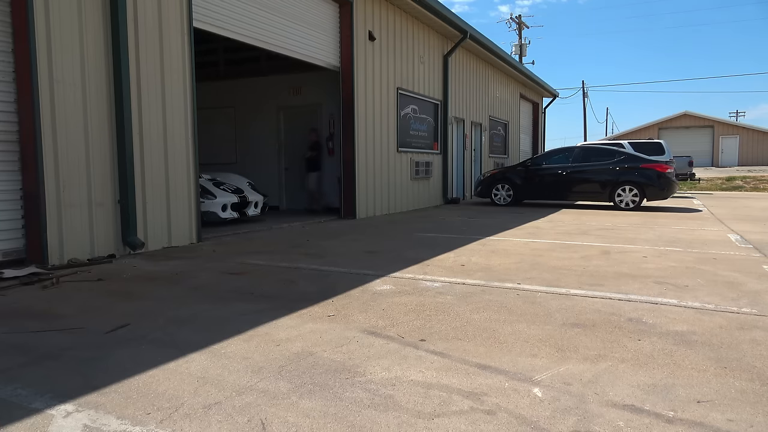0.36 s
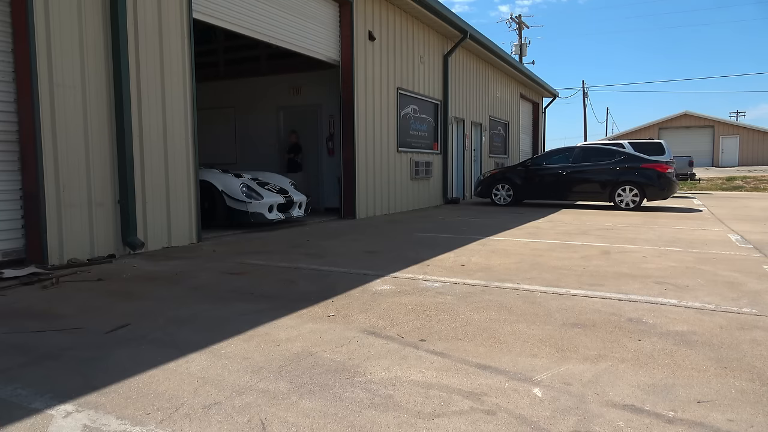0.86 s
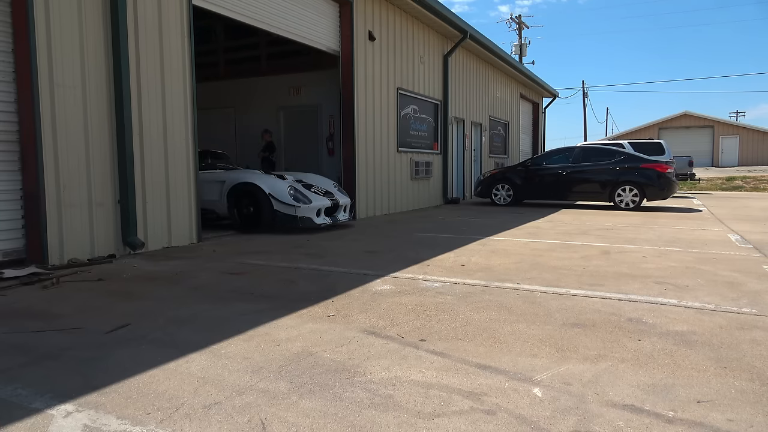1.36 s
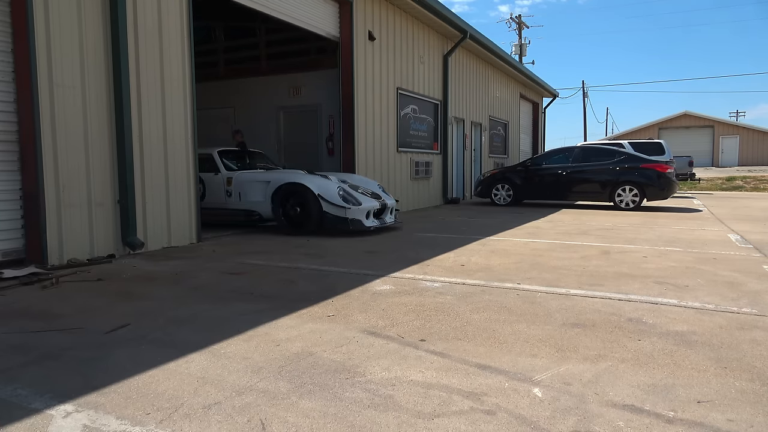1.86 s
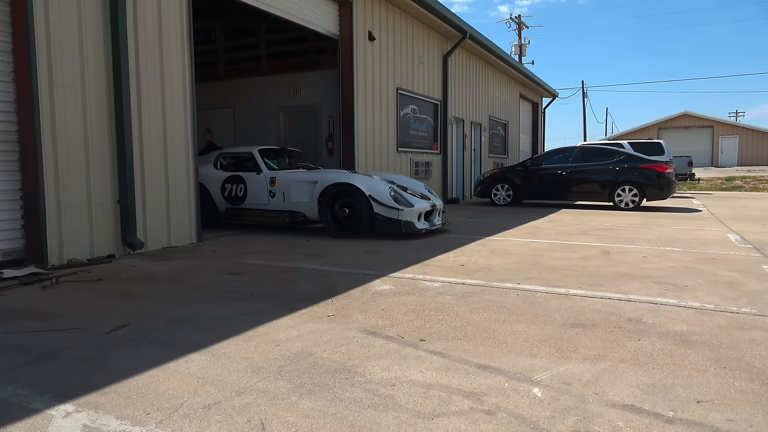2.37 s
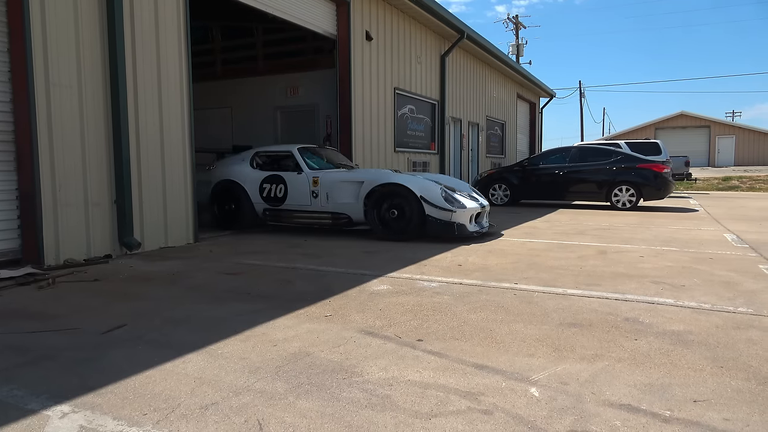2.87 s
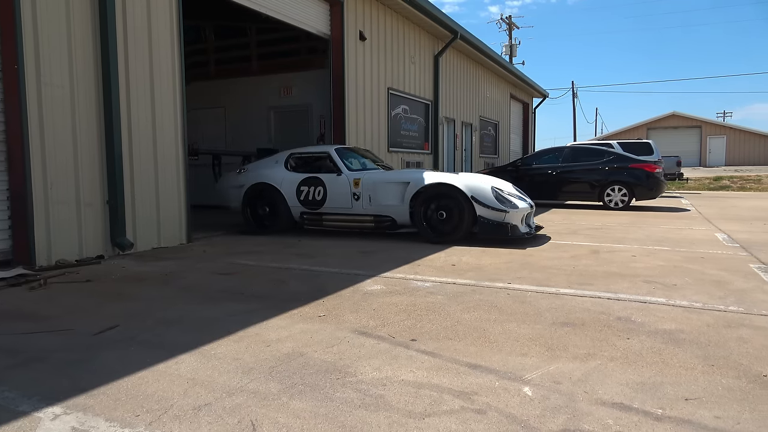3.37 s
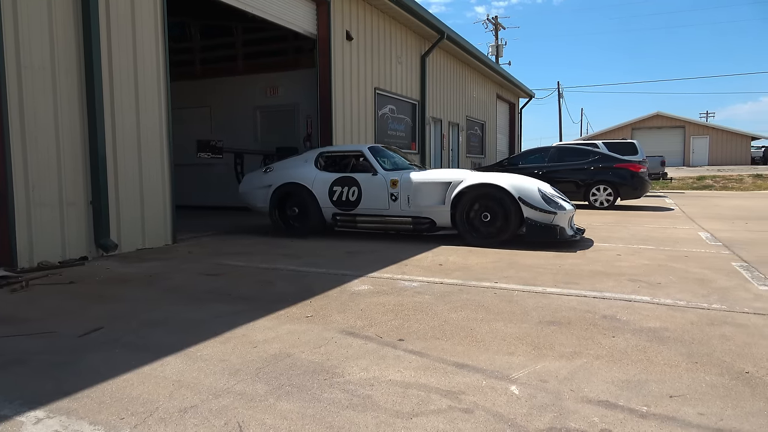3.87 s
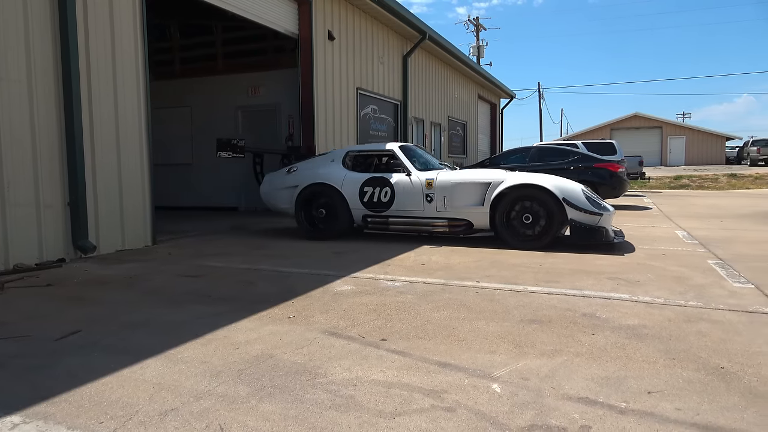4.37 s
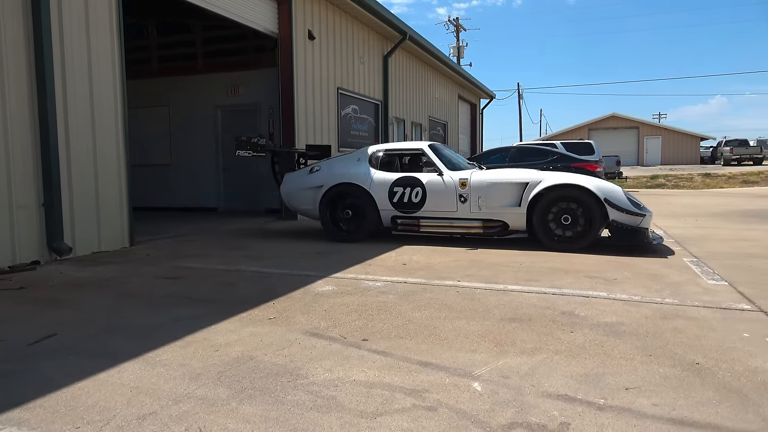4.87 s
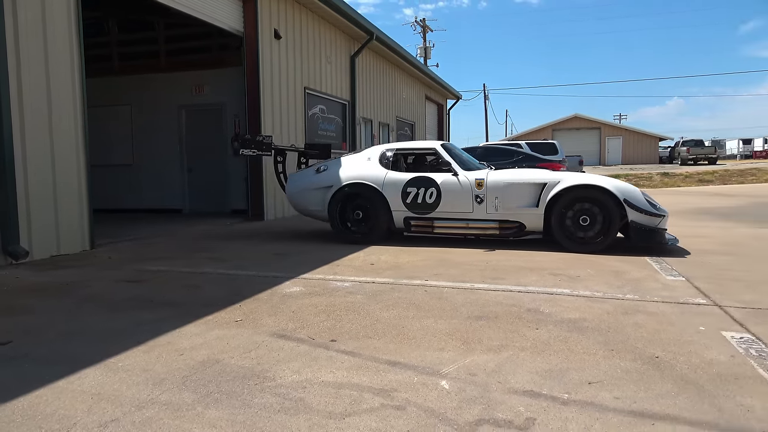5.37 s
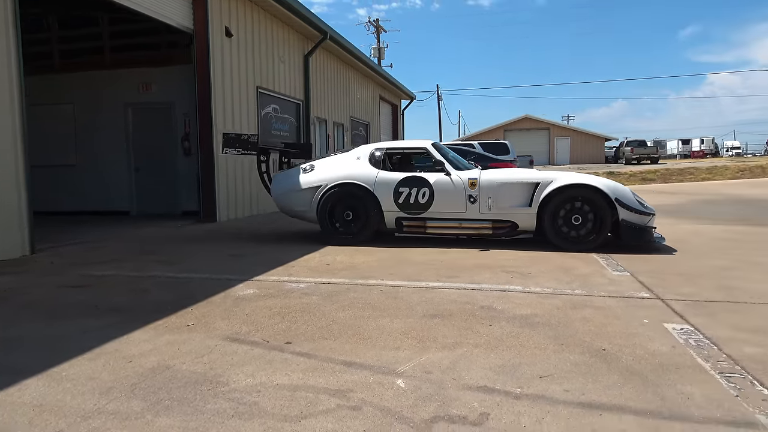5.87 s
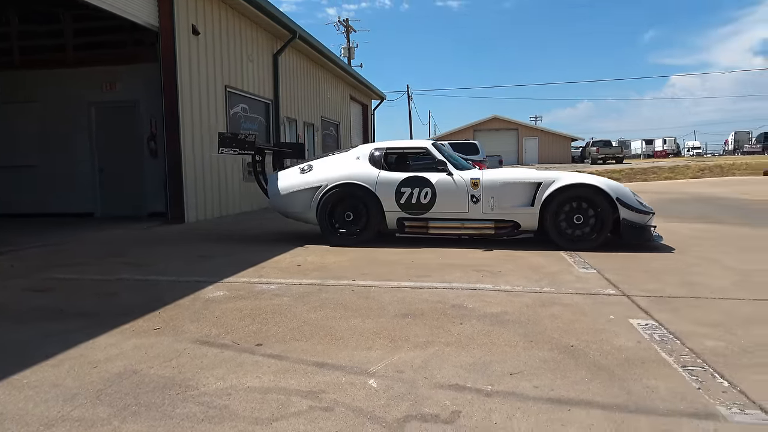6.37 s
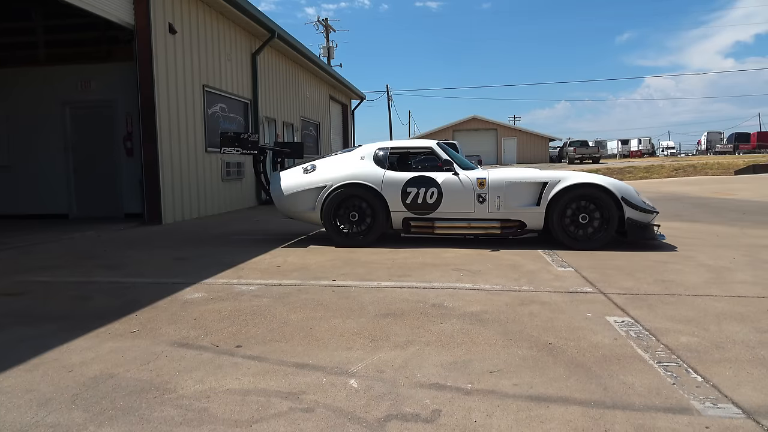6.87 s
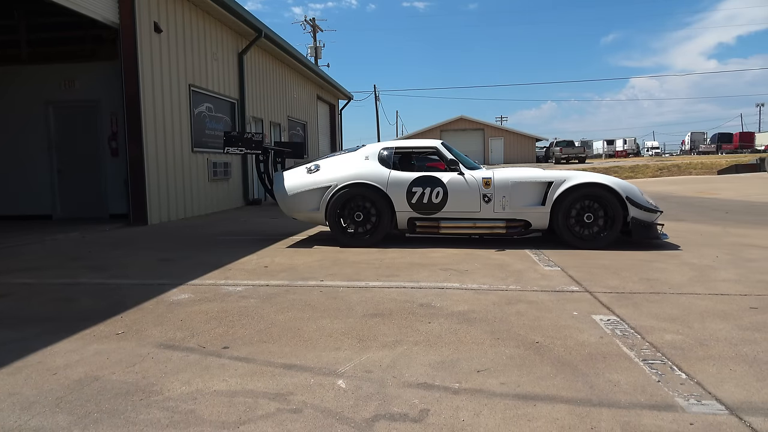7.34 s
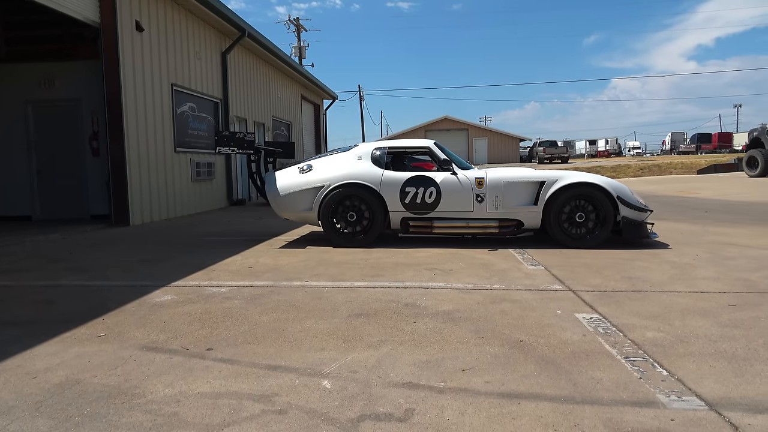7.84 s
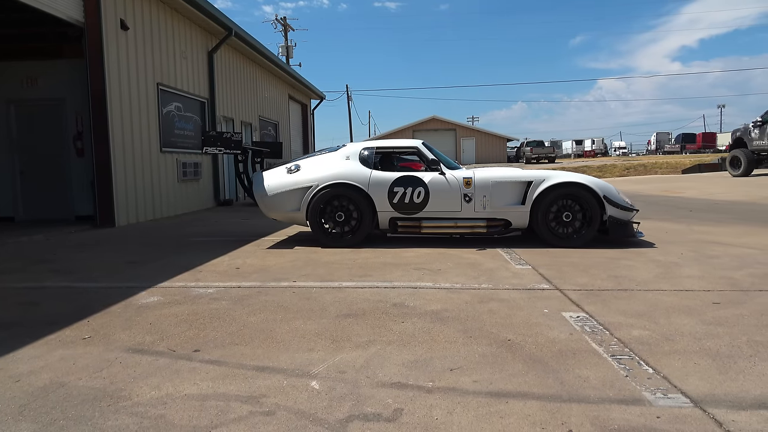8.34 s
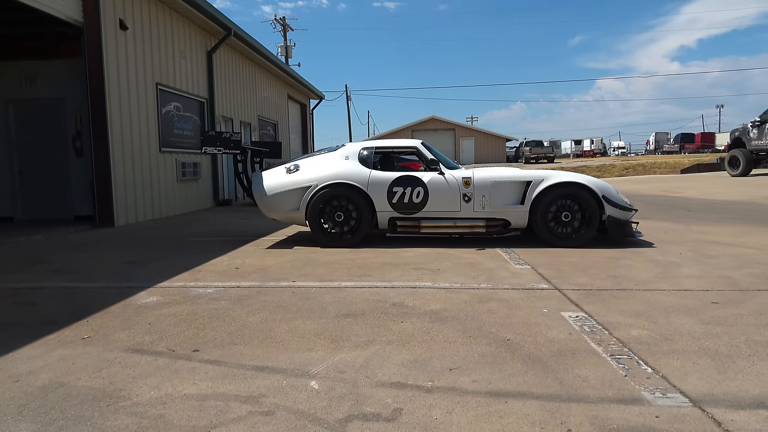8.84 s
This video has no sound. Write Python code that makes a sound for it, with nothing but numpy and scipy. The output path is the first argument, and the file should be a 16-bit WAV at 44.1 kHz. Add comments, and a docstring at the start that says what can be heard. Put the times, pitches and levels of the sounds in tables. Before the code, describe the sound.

Outdoors by a metal shed, a race car with a big V8 and side pipes creeps out onto concrete. Its fast, droning idle drops within the first second or so to a slow, lumpy burble of strong and weak beats. Raspy exhaust gusts, valve ticks and light hiss sit above, with a few tiny squeaks and scuffs. Stereo microphone at a modest distance, sound leaning left; the throttle opens at the very end.

```python
"""Uneven, lumpy exhaust beats of a cross-plane V8 with side pipes, falling from a fast idle to a slow one. The
car creeps out of a metal shed onto a concrete apron: firing impulses, most of them strong from the near pipe's
bank and faint from the far one, excite resonances and gate noise. Clear crank orders swell and fade early on.
Sharp cracks from the firings tick above a steady hiss, with lone scuffs and squeaks from the car; the throttle
opens at the very end. The recorder's limiter holds the peaks down."""
import sys
import numpy as np
from scipy import signal
from scipy.fft import rfft, irfft, next_fast_len
from scipy.io import wavfile
from scipy.ndimage import uniform_filter1d, minimum_filter1d

SR = 44100
rng = np.random.default_rng(int(sys.argv[2]) if len(sys.argv) > 2 else 0)


def attenuation_scalar(level_db):
    """Turn a level in dB into a linear amplitude multiplier (20 dB per decade)."""
    decades = np.asarray(level_db, float) / 20
    return 10 ** decades


def materialize(psi):
    """Save the field psi as 16-bit PCM at rate SR to the path in sys.argv[1].

    A 1-D psi becomes a single channel; in a 2-D psi each row is a channel.
    """
    bounded = np.clip(np.atleast_2d(psi).T, -1, 1)
    quanta = np.round(bounded * 32767).astype(np.int16)
    wavfile.write(sys.argv[1], SR, quanta)


N = 406602
LEFT_RIGHT = np.array([[1], [-1]])   # opposite signs in the two channels

# Crank speed. Each row: time in seconds, four-stroke cycles per second.
SPEED = [(0, 13.505), (.3, 12.893), (.6, 10.43), (.9, 9.07), (1.2, 8.697), (1.5, 8.554), (2.4, 7.786),
         (3.2, 7.416), (4, 7.268), (6, 7.081), (6.6, 7.376), (7.5, 7.163), (8.1, 7.397), (8.8, 7.223),
         (9.115, 7.3), (9.19, 8.05), (9.22, 8.45)]
# Unevenness of burning. Each row: time in seconds, unevenness from 0 to 1.
ROUGH = [(0, .4), (.8, .3), (1.2, .32), (4.2, .3), (4.5, .55), (5.1, .45), (5.5, .58), (7.0, .55),
         (7.3, .4), (9.22, .4)]
# The shed's lowest air mode and the lean of the pipe sound. Each row: time in seconds, mode level in dB,
# lean in dB (positive to the left; each layer takes its own share of it).
SHED = [(0.1, -40, 1.5), (0.4, -49, 2), (3.1, -37.5, 2.5), (4.2, -43, 1), (6.3, -42.5, 1),
        (9.2, -41.5, 1.13)]
# Engine block and covers that colour the noise. Each row: centre in Hz, width in Hz, level in dB.
# Signs alternate down the rows, so every second row is a dip between two peaks.
COVERS = [(1170, 120, -2.5), (2020, 150, -3), (2300, 130, 2), (2800, 300, -7), (3450, 200, -1),
          (5250, 200, -11), (5570, 230, -9)]
# Noisy treble before the throttle's rise. Each row: time in seconds, rasp level in dB, hiss level in dB.
TREBLE = [(0.05, -47, -56.5), (0.4, -53.5, -58), (0.76, -50.5, -58.5), (0.95, -51, -54.5), (2.05, -48, -54),
          (2.2, -51.5, -56.5), (3.35, -50, -56), (3.6, -48, -53), (4.3, -49.5, -54.5), (5.5, -49.5, -54.5),
          (5.75, -50.5, -56), (7.4, -50.5, -55), (7.95, -49.5, -54), (8.15, -53, -57), (9.1, -51.5, -56.5)]


def amp_curves(rows):
    """Linear interpolation: the columns of a table against time, one value a sample."""
    s, *columns = np.transpose(rows)
    return [np.interp(np.arange(N) / SR, s, c) for c in columns]


def crank_cycles():
    """Phase is the integral of frequency: engine cycles turned since the beginning."""
    return np.cumsum(amp_curves(SPEED)[0]) / SR


def even(x, seconds):
    """Level normalisation: division by the rms over a window smoothed twice."""
    width = int(seconds * SR)
    power = uniform_filter1d(uniform_filter1d(x ** 2, width), width)
    return x / np.sqrt(power + 1e-20)


def resonate(x, modes):
    """Modal superposition: parallel damped resonators whose signs alternate."""
    out = 0
    for k, (hz, width, level_db) in enumerate(modes):
        r = np.exp(-np.pi * width / SR)   # pole radius sets the bandwidth
        b = [(1 - r * r) / 2, 0, (r * r - 1) / 2]
        a = [1, -2 * r * np.cos(2 * np.pi * hz / SR), r * r]
        out = out + (-1) ** k * attenuation_scalar(level_db) * signal.lfilter(b, a, x + 1e-18)
    return out


def cut(x, hz, kind, order):
    """Butterworth filtering: a maximally flat passband."""
    return signal.sosfilt(signal.butter(order, hz, kind, fs=SR, output="sos"), x)


def colour(x, spectrum):
    """Spectral shaping: gain interpolated along log frequency, held at the table's end values."""
    hz, level_db = np.transpose(spectrum)
    size = next_fast_len(N)
    f = np.maximum(np.arange(size // 2 + 1) * SR / size, 1)
    gain = attenuation_scalar(np.interp(np.log(f), np.log(hz), level_db))
    return irfft(rfft(x, size) * gain, size)[..., :N]


def puff(impulses, seconds):
    """Two equal relaxations in cascade: each impulse opens a gate that swells and dies away."""
    r = np.exp(-1 / (seconds * SR))
    decays = signal.lfilter([1], [1, -r], impulses + 1e-18)
    return signal.lfilter([(1 - r) * np.e], [1, -r], decays)


def train(pattern_db, late_ms, scatter_db, jitter_s):
    """Phase-locked impulses, eight a cycle; a lumpy cam scatters their strength and timing."""
    start_cycle = .558   # crank position at the beginning, in cycles
    eighths = 8 * (start_cycle + crank_cycles())
    number = np.arange(np.ceil(eighths[0]), eighths[-1]).astype(int)
    place = number % 8
    at = np.interp(number, eighths, np.arange(N))
    chance = rng.standard_normal((len(number), 2)) * amp_curves(ROUGH)[0][at.astype(int), None]
    at = at + SR * (np.array(late_ms)[place] / 1000 + jitter_s * chance[:, 0])
    strength = attenuation_scalar(np.array(pattern_db)[place] + scatter_db * chance[:, 1])
    impulses = np.zeros(N)
    np.add.at(impulses, np.clip(at, 0, N - 1).astype(int), strength)
    return impulses


def exhaust():
    """Impulsive excitation of resonances: firings and their puffs of turbulence ring the pipe's modes."""
    # Firing strength in dB by place in the firing order: places 1, 3, 4, 6 (from 0) leave by the near pipe.
    firing_db = [-13, -1, -16, 0, -2, -14, 0, -15]
    # Header pipes differ in length: mean delay of each firing at the outlet in milliseconds.
    header_ms = [6.5, 1.6, 4.2, 0, .9, 7.3, 1.2, 5.0]
    # How hard each firing rings the burble modes, in dB.
    burble_drive_db = [-2, -15, -9.5, -7.5, 0.5, -6, -7.5, -15]
    # How hard each firing rings the bark modes, in dB: three firings in a row drive them.
    bark_drive_db = [-26.5, -12.5, -14, -18.5, -1, -3.9, -3.5, -16]
    # Base levels of the low layers. Each row: time in seconds, boom in dB, throb in dB, thump in dB.
    pipe_levels = [(0.05, -31.5, -23.5, -37.5), (0.6, -30, -21, -47), (0.86, -12.5, -17.5, -37),
                   (1.15, -19.5, -20.5, -37), (2.1, -17.5, -17, -54.5), (2.85, -13.5, -16.5, -52),
                   (3.6, -12.5, -16.5, -35.5), (4.6, -10.5, -17.5, -39.5), (5.6, -9.5, -20, -31),
                   (6.6, -12.5, -16, -25.5), (7.4, -13.5, -18, -33), (8.1, -10, -18, -47.5),
                   (9.2, -13.5, -19, -36.5)]
    # Base levels of the upper pipe modes. Each row: time in seconds, bark in dB, growl in dB.
    upper_levels = [(0.05, -38, -32.5), (0.4, -34, -34), (0.95, -39, -40), (2.2, -35.5, -38),
                    (3, -35.5, -37), (3.45, -26.5, -38), (3.72, -37, -35), (4.28, -19.5, -34.5),
                    (4.5, -29, -34.5), (4.9, -26, -38), (5.45, -29.5, -37), (5.72, -23.5, -39.5),
                    (6.1, -31.5, -41), (6.9, -26, -38.5), (7.3, -31.5, -39), (8.3, -28.5, -39.5),
                    (8.72, -34, -41.5), (9.1, -29, -40)]
    # Resonances, lowest layer first. Each row: centre in Hz, width in Hz, level in dB within its layer.
    shed_modes = [(40.8, 18, 0)]
    thump_modes = [(79, 140, 0)]
    boom_modes = [(118.37, 9.26, 16.5), (121, 250, -4.5), (139.6, 1.2, 7.5)]
    throb_modes = [(152.2, 41.3, 0.96), (180.6, 33.3, -1.8)]
    burble_modes = [(217.9, 30.1, 2.5), (250, 20, -7)]
    bark_modes = [(348, 25, 15), (320, 35, -9), (368.7, 17, 0)]
    growl_modes = [(475, 67, 2), (350, 128, 5), (617.6, 114, 0.5)]

    boom_db, throb_db, thump_db = amp_curves(pipe_levels)
    boom_change_db, throb_change_db = stumbles()
    boom_db = boom_db + boom_change_db - 2 * blip_db()   # the boom gives way to the rising order
    throb_db = throb_db + throb_change_db
    bark_db, growl_db = amp_curves(upper_levels)
    growl_db = growl_db + blip_db()
    shed_db, lean_db = amp_curves(SHED)

    firings = train(firing_db, header_ms, scatter_db=4.5, jitter_s=.0007)
    pushes = train(firing_db, header_ms, scatter_db=2.5, jitter_s=.0004)   # the slow push varies less
    burbles = train(burble_drive_db, header_ms, scatter_db=4.5, jitter_s=.0007)
    barks = train(bark_drive_db, np.full(8, 8), scatter_db=9, jitter_s=.0007)
    noise = rng.standard_normal(N) * np.sqrt(amp_curves(ROUGH)[0]) * attenuation_scalar(-27)
    out = 0
    # drive, modes, level in dB, share of turbulence, levelling window in s, band edges in Hz, share of lean
    for drive, modes, level_db, rough, window_s, edges_hz, lean in [
            (pushes, shed_modes, shed_db, .3, .25, [30, 56], -.4),
            (pushes, thump_modes, thump_db, .4, .2, [67, 95], .4),
            (pushes, boom_modes, boom_db, .2, .03, [80, 160], .4),
            (firings, throb_modes, throb_db - 3, .35, .12, [135, 210], .6),
            (burbles, burble_modes, throb_db - 3.5, .55, .12, [190, 290], .7),
            (barks, bark_modes, bark_db, .25, .5, [310, 395], .8),
            (firings, growl_modes, growl_db, 2.0, .25, [380, 760], .8)]:
        turbulence = (.25 + puff(drive, .007)) * noise
        rung = cut(resonate(drive + rough * turbulence, modes), edges_hz, "band", order=2)
        out = out + attenuation_scalar(level_db + lean * lean_db * LEFT_RIGHT) * even(rung, window_s)
    return out, firings


def lope():
    """Amplitude modulation: at fast idle the pipe sound comes in one lump a cycle, fading in time."""
    depth_db, place, fade_s = 3, 0.39, 0.74   # place in cycles
    fade = np.exp(-(np.arange(N) / SR / fade_s) ** 2)
    return attenuation_scalar(depth_db * fade * np.cos(2 * np.pi * (crank_cycles() - place)))


def clear_orders():
    """Order resonance: tones locked to the crank swell and fade as they cross the shed's resonances early on; a
    last one swells and rises in pitch as the throttle opens at the end."""
    # Each row: order (periods per cycle), middle in seconds, half-length to 1/e in seconds,
    # peak level in dB before lean, waver and lope.
    orders = [(8, 0.16, 0.17, -25.5), (24, 0.034, 0.24, -26.5), (27, 0.15, 0.4, -30.5),
              (29, 0.038, 0.22, -29.5), (19, 0.23, 0.093, -21.5), (11, 0.035, 0.25, -19.5),
              (10, 0.25, 0.25, -18.5), (11, 0.52, 0.11, -14), (13, 1.41, 0.42, -22), (19, 1.4, 0.7, -26),
              (5, 1.84, 1, -30), (21, 1.1, 0.44, -20.5), (16, 2.4, 0.32, -18), (24, 2.4, 0.45, -22.5),
              (27, 1.8, 0.27, -24), (40, 1.105, 0.12, -35), (16, 9.2, 0.1, -10.5)]
    waver_depth_db, waver_s = 2.0, .1   # standard deviation, spacing of the random levels
    cycles, now = crank_cycles(), np.arange(N) / SR
    lean = attenuation_scalar(amp_curves(SHED)[1] * 0.78 * LEFT_RIGHT)
    steps = np.arange(0, now[-1] + 1, waver_s)
    out = 0
    for order, middle, half, peak_db in orders:
        waver_db = waver_depth_db * np.interp(now, steps, rng.standard_normal(len(steps)))
        swell = attenuation_scalar(peak_db) * np.exp(-((now - middle) / half) ** 2)
        tone = swell * np.sin(2 * np.pi * order * cycles)
        # the deepest order fills the shed evenly and steadily
        out = out + tone * (lean * attenuation_scalar(waver_db) if order > 6 else 1)
    return out


def rasp(firings):
    """Jet noise: gas tears out of the pipe in gusts gated by the firings, and echoes along its length."""
    # Each row: frequency in Hz, spectral level in dB per Hz (relative).
    rasp_spectrum = [(440, -39.5), (750, -4.5), (992, -3.5), (1100, -6), (1770, -8), (2030, -5.5),
                     (2260, -18), (2670, -16), (3200, -20), (4160, -42.5), (7040, -120)]
    trip_s, returned = .00427, .4   # up and down the pipe, returning inverted: seconds, share
    mid, side = (0.47 + puff(firings, 0.016)) * rng.standard_normal((2, N))
    mid = signal.lfilter([1], np.r_[1, np.zeros(int(trip_s * SR) - 1), returned], mid)
    both = mid + resonate(mid, COVERS) + attenuation_scalar(-20) * side * LEFT_RIGHT
    return attenuation_scalar(amp_curves(TREBLE)[0] + blip_db()) * even(colour(both, rasp_spectrum), 0.48)


def cracks_and_hiss():
    """Impact noise: short cracks at the firings over steady hiss, with less alike tops in the two ears."""
    # Tick strength in dB by place in the firing order.
    tick_db = [-14, -4, -14, -6, 0, -18, -10, -16]
    # The cracks grow stronger as the car leaves the shed. Each row: time in seconds, relative strength.
    exposure_curve = [(0, 0.055), (2, 0.087), (3.4, 1.4), (6, 1.6), (9.22, 2.9)]
    # What each tick rings with. Each row: centre in Hz, width in Hz, level in dB.
    tick_ring = [(7200, 1900, -1), (11600, 1700, -2)]
    # Each row: frequency in Hz, spectral level in dB per Hz (relative).
    hiss_spectrum = [(1650, -22), (2800, 2.5), (3450, -6.5), (3920, -3), (4900, -4), (6500, -6.5),
                     (7320, -7), (8700, -9.5), (11700, -14.5), (13800, -22.5), (15600, -29.5)]
    exposure = amp_curves(exposure_curve)[0]
    taps = train(tick_db, np.full(8, 3.5), scatter_db=5, jitter_s=.0018)
    # the time-reversed puff makes each burst swell before it peaks
    ticks = puff(puff(taps, .002)[::-1], .0007)[::-1] / 100 * exposure
    after = 0.6 * puff(taps, 0.0087) * exposure   # a softer sizzle follows each crack
    mid, side = rng.standard_normal((2, N))
    both = mid + attenuation_scalar(-12.5) * cut(side, 5600, "high", order=4) * LEFT_RIGHT
    # ticks reach higher than the steady hiss
    top_lift = 2.6 * cut(both * ticks, 9500, "high", order=2)
    top_lift = top_lift + 0.68 * resonate(both * (0.8 * ticks + after), tick_ring)
    both = both * (0.61 + 0.12 * ticks) + top_lift
    shade = 0.5 * np.clip(1 - exposure, 0, 1)   # the shed shades the top
    both = both - shade * cut(both, 6000, "high", order=1)
    both = colour(both + resonate(both, COVERS), hiss_spectrum)
    return attenuation_scalar(amp_curves(TREBLE)[1] + 0.17 * blip_db()) * even(both, .3)


def scuffs():
    """Bandwidth sets tonality: narrow noise bursts squeak, wide ones tick or scuff."""
    # Lone sounds from the car. Each row: middle in seconds, rms level at the peak in dB, centre in Hz,
    # width in Hz of the first of two filters, length between 1/e points in seconds.
    lone_sounds = [(0.034, -45, 1500, 1080, 0.014), (0.194, -58, 1500, 700, 0.018),
                   (0.255, -44.5, 1220, 696, 0.024), (0.552, -44.5, 1220, 250, 0.012),
                   (0.842, -55, 3340, 1980, 0.11), (0.994, -59.5, 9070, 1980, 0.12),
                   (1.058, -62.5, 10500, 1770, 0.075), (1.456, -48, 4450, 6800, 0.016),
                   (1.994, -51, 10200, 2950, 0.011), (2.019, -52.5, 4550, 150, 0.024),
                   (2.079, -56, 4520, 150, 0.056), (1.121, -57, 3980, 3000, 0.28),
                   (1.664, -61, 5600, 600, 0.42), (3.22, -49, 2730, 2520, 0.029),
                   (8.792, -56.5, 2450, 1830, 0.036), (9.066, -53, 6000, 4000, 0.02),
                   (9.067, -44.5, 2200, 199, 0.02), (9.099, -48.5, 2400, 1510, 0.017)]
    out = np.zeros(N)
    offset = np.arange(-8000, 8000)
    for s, peak_db, hz, width, length in lone_sounds:
        burst = resonate(rng.standard_normal(16000), [(hz, width, 0)])
        burst = resonate(burst, [(hz, 2 * width, 0)])
        swell = attenuation_scalar(peak_db) * np.exp(-(2 * offset / SR / length) ** 2)
        at = offset + int(s * SR)
        # indices before the beginning wrap to the end, where the swell is negligible
        inside = at < N
        out[at[inside]] += (swell * burst / burst.std())[inside]
    return out


def stumbles():
    """Gaussian level changes: the lumpy idle stumbles and the low modes falter or surge, in dB."""
    # Each row: middle in seconds, boom change in dB, throb change in dB.
    moments = [(0.43, 1, 0.5), (0.528, 0, 4), (0.65, 0, 1.5), (3.13, -0.5, 5.5), (3.623, -5.5, 5),
               (4.42, -2, 4.5), (5.124, -6.5, 5.5), (5.242, -7.5, 3), (5.37, -11, 2), (5.66, -10.5, 5),
               (5.94, -4.5, 1), (6.149, -2, 1.5), (6.391, -12.5, -0.5), (7.209, -6, -1.5),
               (8.759, -6.5, -2.5)]
    half_s = 0.04   # half-length to 1/e
    now = np.arange(N) / SR
    return sum(np.outer([boom_db, throb_db], np.exp(-((now - s) / half_s) ** 2))
               for s, boom_db, throb_db in moments)


def blip_db():
    """Exponential growth: the throttle opens at the end and the level in dB climbs as a straight line."""
    start_s, db_per_s = 9.13, 130
    return db_per_s * np.maximum(np.arange(N) / SR - start_s, 0)


def scene():
    """Superposition: the lumpy pipe sound leans mostly left, less so as the car comes abreast."""
    pipe, firings = exhaust()
    return lope() * (pipe + clear_orders()) + rasp(firings) + scuffs() + cracks_and_hiss()


def band_limit(x):
    """A steep low-pass at the top of the band."""
    return signal.sosfilt(signal.butter(12, 15700, fs=SR, output="sos"), x)


def record(dry):
    """Peak limiting: one gain for both channels, so a boom over the ceiling ducks the hiss too."""
    ceiling = 0.5
    hot = dry * attenuation_scalar(1.5)
    over = np.minimum(1, ceiling / (np.abs(hot).max(axis=0) + 1e-9))
    gain = uniform_filter1d(minimum_filter1d(over, size=800), size=600)   # windows in samples
    return band_limit(hot * gain)


dry = scene()
out = record(dry)
materialize(out)
```